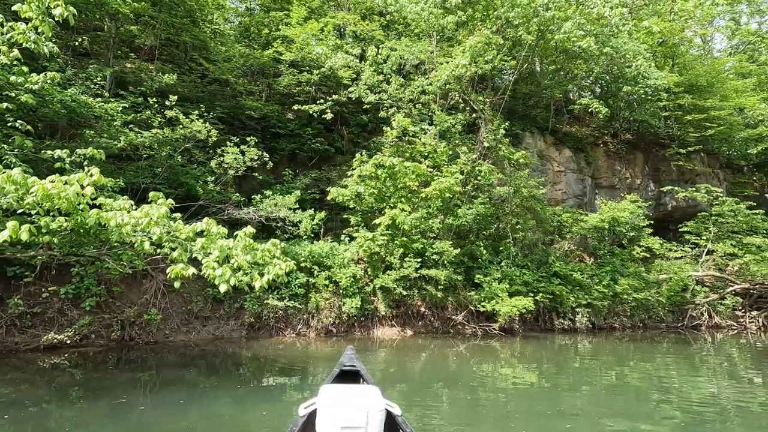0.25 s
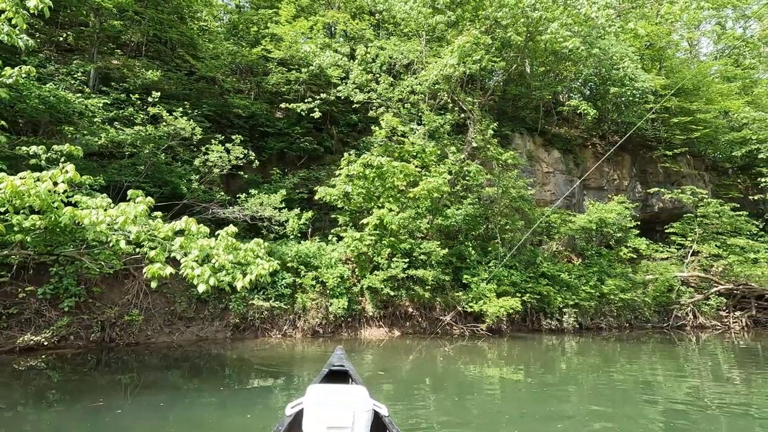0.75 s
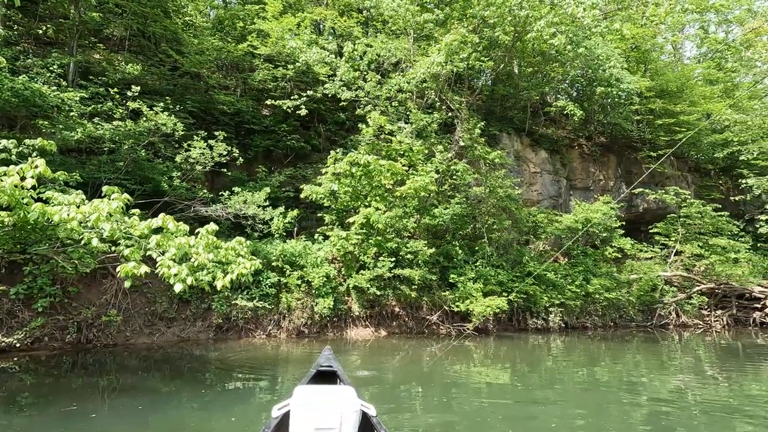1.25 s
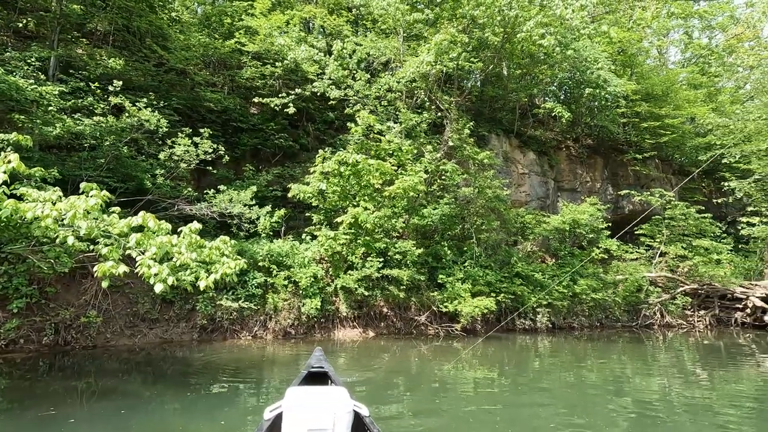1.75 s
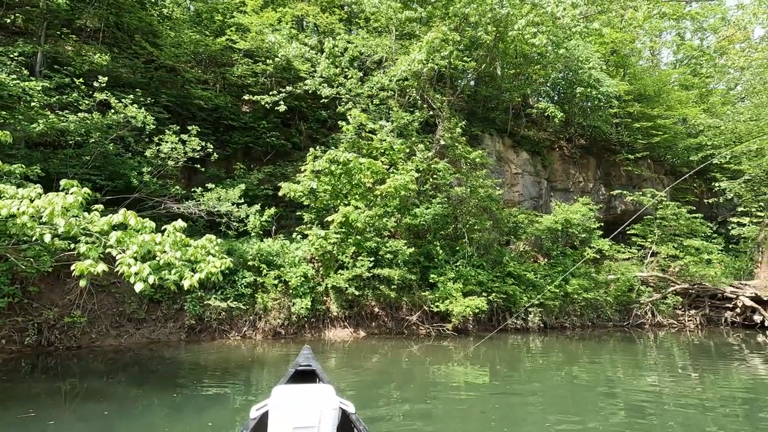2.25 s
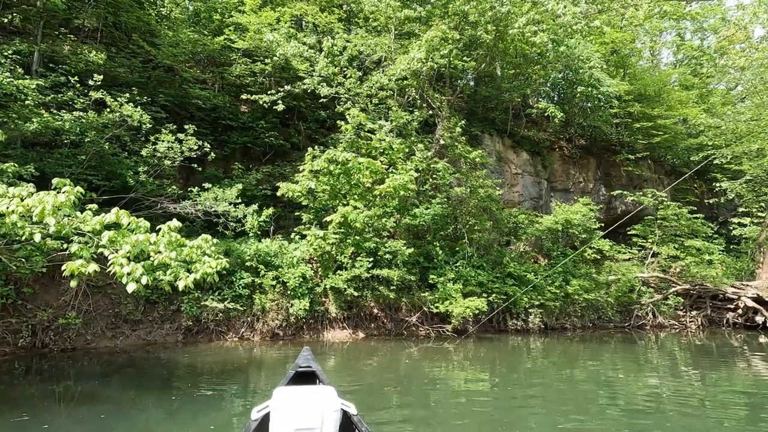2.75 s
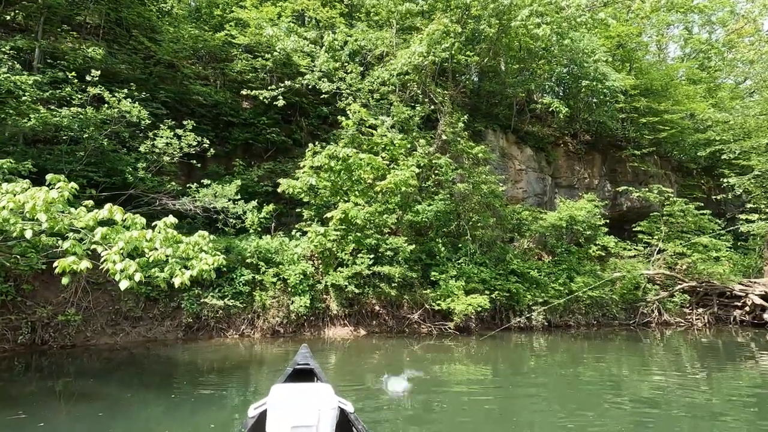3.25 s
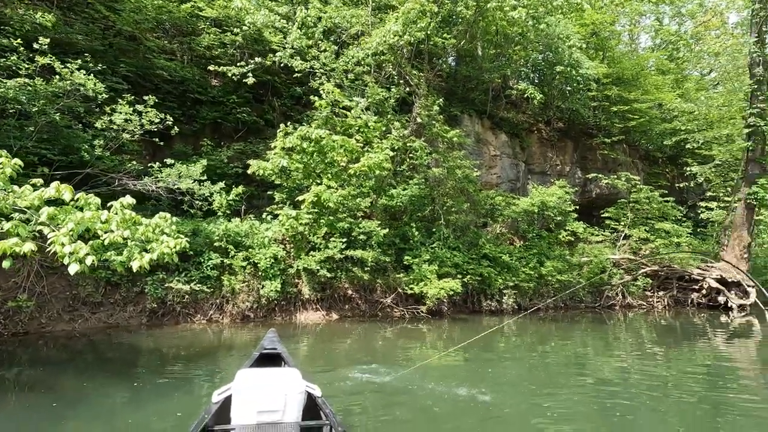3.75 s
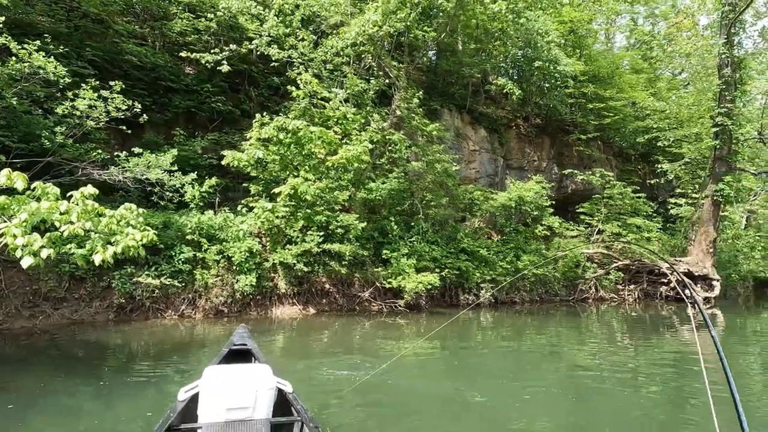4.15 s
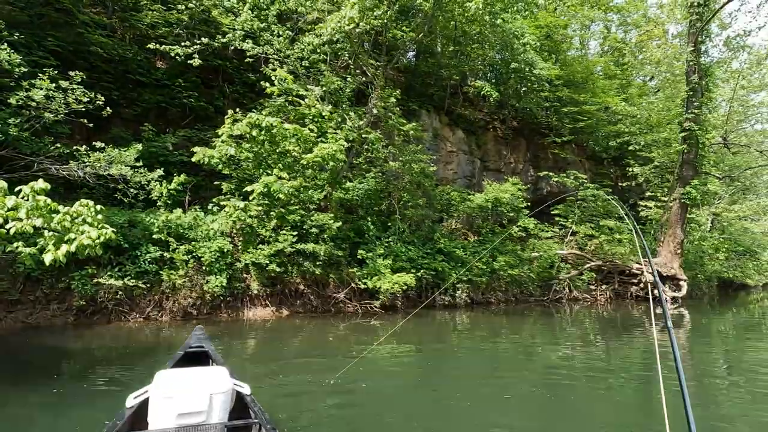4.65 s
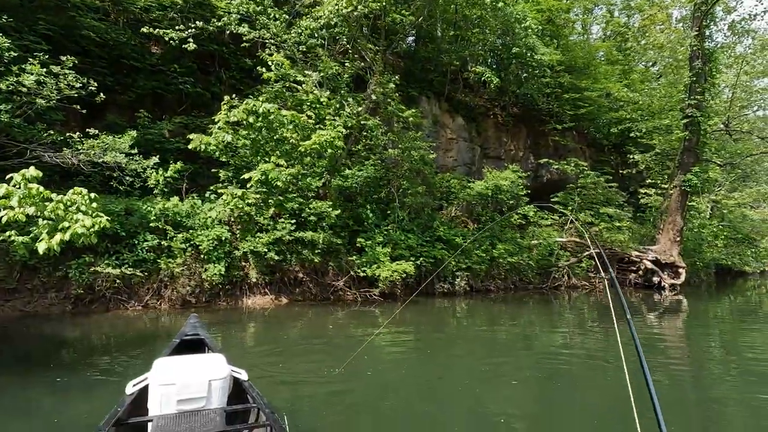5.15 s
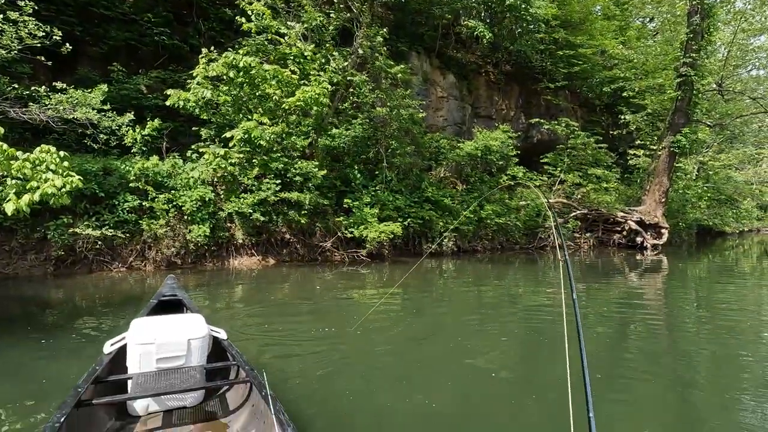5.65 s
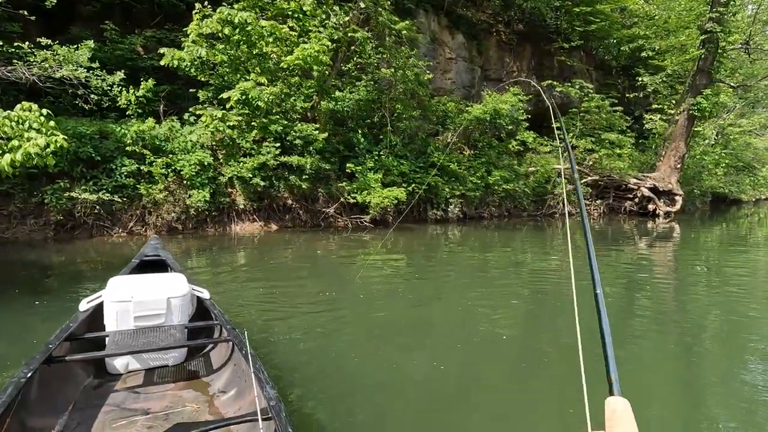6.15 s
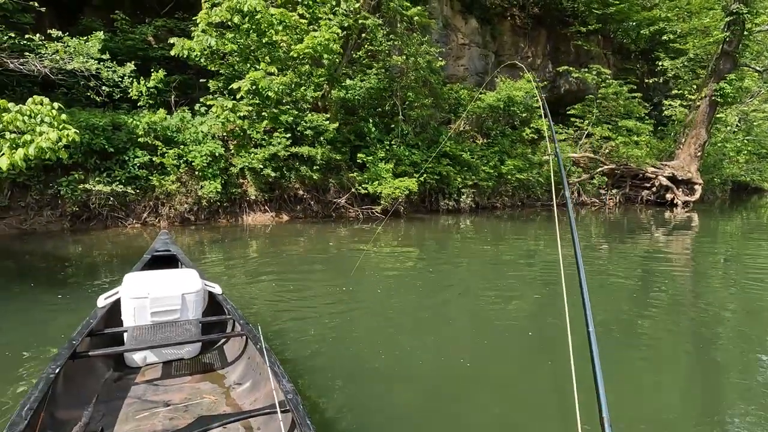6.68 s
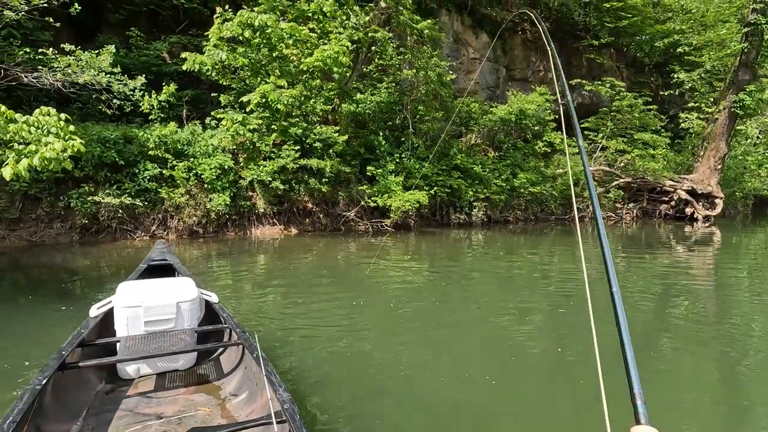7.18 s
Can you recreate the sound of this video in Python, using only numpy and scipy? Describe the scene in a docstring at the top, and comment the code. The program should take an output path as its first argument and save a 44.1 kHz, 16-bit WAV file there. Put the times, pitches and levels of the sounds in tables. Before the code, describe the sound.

A fly line hisses and snaps in repeated casts, splashes into a river, then a reel clicks in short pulls while birds chirp faintly.

```python
"""A fly line hisses through the rod guides and snaps at the end of a stroke; the fly splashes down.
Then line is pulled off a clicking reel. The caster sits in a canoe on a slow, wooded river.
Friction makes the hiss, a pawl rings the reel's spool, and trapped bubbles give the splash its pitch.
Birds whistle on the bank, water laps the hull, and light air nudges a stereo microphone.
After the splash the image narrows to the centre; near the end the sound cuts out briefly."""
import sys
import numpy as np
from scipy import signal
from scipy.fft import rfft, irfft, next_fast_len
from scipy.io import wavfile
from scipy.ndimage import uniform_filter1d

SR = 44100
rng = np.random.default_rng(int(sys.argv[2]) if len(sys.argv) > 2 else 0)


def put_to_file(sound):
    """Save the sound as 16-bit audio at rate SR, in the file named by the first command-line argument."""
    columns = np.atleast_2d(sound).T  # one column per channel
    safe = np.clip(columns, -1, 1)
    whole_steps = np.round(safe * 32767)
    wavfile.write(sys.argv[1], SR, whole_steps.astype(np.int16))


N = 327122
TIME = np.arange(N) / SR
# spectrum of a small metal contact: frequency_hz, level_db
TICK_SPECTRUM = [(1500, -15), (3000, -8.5), (5000, -6), (6600, -15.5), (8800, 0), (10800, -9.5),
                 (12000, -5), (15000, -15)]


def line_friction():
    """Sliding friction: line rubs the guides with tiny catches, louder as each stroke gains speed."""
    # start_s, fastest_s, end_s, hiss_db, rasp_db, start_drop_db, end_drop_db, pitch_ratio
    strokes = [(.44, .47, 0.54, -75.5, -81, 12, -7, 0.92), (.515, .7, .897, -52.3, -68, 8, 4, .98),
               (0.922, .94, 0.99, -70.5, -71.5, -6, 9, 1.08),
               (1.853, 2.17, 2.289, -52.5, -79.5, 21.5, 12, 1.02),
               (3.024, 3.34, 3.36, -54, -77, 19.5, 0.5, 1.023), (3.434, 3.46, 3.49, -75.5, -88, 4, 6, 1.04),
               (3.644, 3.66, 3.77, -65, -86, 14, 13, 1.03)]
    # spectra of the high hiss and the low rasp: frequency_hz, level_db
    hiss_spectrum = [(1000, -26), (2100, -18.5), (2900, -7.5), (3550, 1), (4100, 1.5), (4960, -3),
                     (5800, -12.5), (6700, -14.5), (9000, -33.5), (11100, -25), (12400, -29), (13400, -50),
                     (14500, -66)]
    rasp_spectrum = [(400, -13.5), (800, -14.5), (1100, 0), (1600, -3), (2400, 1), (3200, -4.5),
                     (4500, -29), (9000, -70)]
    # phase by which the hiss leads on the left: frequency_hz, lead_rad
    phase_lead = [(0, 0), (1000, 0.26), (2500, -1.3), (4400, -1), (6100, 0.41), (11000, 0)]
    flatness, edge_s, rasp_share = 2.56, .006, .1
    out = np.zeros((2, N))
    lead = np.exp(.5j * read(phase_lead, np.fft.rfftfreq(SR, 1 / SR)) * np.array([[1], [-1]]))
    for start, fastest, end, hiss_db, rasp_db, start_drop, end_drop, pitch in strokes:
        t = start - 2 * edge_s + TIME[:SR]
        off_peak = abs(np.interp(t, [start, fastest, end], [-1, 0, 1])) ** flatness
        arch_db = -off_peak * np.where(t < fastest, start_drop, end_drop)
        running = np.exp(-((t - np.clip(t, start, end)) / edge_s) ** 2)
        colour = [(hz * pitch if hz < 8000 else hz, db) for hz, db in hiss_spectrum]
        catches = unit(signal.oaconvolve(grains(per_s=1500, spread_db=6), click(colour))[:SR])
        hiss = unit(noise(colour, alike=.86, patchy_db=2.5, size=SR) + .35 * catches)
        hiss = irfft(rfft(hiss) * lead, SR) * amp(hiss_db + arch_db) * pan(db=-3.5)
        rasp = noise(rasp_spectrum, alike=.73, patchy_db=2, size=SR)
        rasp *= amp(rasp_db + rasp_share * arch_db) * pan(db=-.5)
        add(out, t[0], running * (amp(-1.5) * hiss + amp(2.5) * rasp))
    return out


def line_snaps():
    """Pressure pulses: a sharp crack, opposite in sign at the two microphone ports, then a puff of air."""
    # start_s, level_db, tilt_db_per_octave, puff_relative_db
    snaps = [(1.018, -44, -6.5, 2), (2.1086, -21, -3, -3), (2.7111, -31.5, -6.5, -3),
             (3.3593, -14, -6.5, -7.5)]
    # spectra of the crack and the puff at each port: frequency_hz, level_db
    crack_left = [(100, -20), (400, -4), (1100, -3.5), (2000, -11.5), (4000, -11.5), (8000, -27.5),
                  (16000, -46.5)]
    crack_right = [(60, -23), (200, -0.5), (500, -0.5), (1100, -1.5), (2000, -10), (4000, -24.5),
                   (8000, -48), (16000, -62)]
    puff_left = [(5, -15.5), (30, 2.5), (60, -3.5), (110, -8.5), (200, -13), (400, -29), (1500, -71)]
    puff_right = [(20, -29.5), (110, -10.5), (150, 3), (250, -4), (400, -12), (800, -19.5), (3000, -63)]
    out = np.zeros((2, N))
    for s, db, tilt_db, puff_db in snaps:
        add(out[0], s, -amp(db) * click(crack_left, tilt_db))
        add(out[1], s + .00014, amp(db - 2) * click(crack_right, tilt_db))
        add(out[0], s + .00059, -amp(db + puff_db) * click(puff_left))
        add(out[1], s + .00097, -amp(db + puff_db - 5) * click(puff_right))
    return out


def pawl_drops():
    """A coasting spool ticks more weakly as it slows: yields start_s, body_db, treble_db per tooth."""
    # pulls of line: start_s, tooth_count, first_rate_hz, last_rate_hz, body_db, treble_db
    pulls = [(4.842, 15, 90, 29.6, -53, -77.5), (5.1674, 12, 86, 45, -57, -84.5),
             (5.4904, 4, 57, 35, -56.5, -90), (5.8685, 3, 57, 37, -63, -86), (6.1976, 10, 69, 25, -56, -77),
             (6.6212, 16, 90.01, 33.0, -58.5, -85), (6.9634, 14, 83, 29.5, -56, -83.5),
             (7.368, 5, 85, 90, -59, -84.5)]
    coast_curve, body_db_per_octave, treble_db_per_octave = 1.6, 9, 15
    spread_db, spin_up_db, spin_up_teeth = 2, -2.5, 1.3
    for s, count, first_rate, last_rate, body_db, treble_db in pulls:
        for k, uneven in enumerate(rng.standard_normal(count)):
            coasted = min(k / max(count - 2, 1), 1) ** coast_curve
            rate = first_rate + (last_rate - first_rate) * coasted
            octaves = np.log2(rate / first_rate)
            accent_db = spread_db * uneven + spin_up_db * np.exp(-k / spin_up_teeth)
            yield (s, body_db + body_db_per_octave * octaves + accent_db,
                   treble_db + treble_db_per_octave * octaves + accent_db)
            s += 1 / rate


def reel():
    """Modal resonance: each tooth scrapes the pawl and excites the modes of the spool."""
    # frequency_hz, level_db, t60_s
    spool_modes = [(800, -16, .035), (1145, -14.5, 0.018), (1537, -18.5, .041), (2000, -7.5, 0.052),
                   (2127, -11.5, 0.027), (2596, -1, .02), (2771, -0.5, 0.044), (3800, -22.5, 0.058),
                   (5240, -35, 0.0073), (5760, -24, .014)]
    spool, out = np.zeros((2, N))
    for hz, db, t60 in spool_modes:
        add(spool, 0, amp(db) * ring(hz, t60, phase=rng.random()))
    spool, contact = spool[:SR // 16], click(TICK_SPECTRUM)[:256]
    t, bite_s = TIME[:700], .0005
    for s, body_db, treble_db in pawl_drops():
        scrape = rng.standard_normal(len(t)) * (1 - np.exp(-t / bite_s))
        # the scrape decays to a floor, as the pawl drags on the next tooth
        body = signal.fftconvolve(scrape * (amp(-60 * t / .009) + amp(-26)), spool)
        tick = signal.fftconvolve(scrape * (amp(-60 * t / .014) + amp(-13.5)), contact)
        add(out, s, at_peak(body, body_db))
        add(out, s, at_peak(tick, treble_db + 10.5))
    return bank_reverb(out, wet_db=-18)


def splash():
    """Bubble resonance: drops trap ringing air; the fly throws up spray, and stray drips follow."""
    # single drops: start_s, level_db, pitch_hz, glide_octaves_per_s, t60_s
    bubbles = [(1.0505, -43, 1050, -5, 0.011), (1.203, -59, 2208, -18, 0.022),
               (2.356, -56.5, 1075, 1.5, .16), (2.672, -62, 1930, 6, 0.037), (2.811, -61, 1755, -2, 0.088),
               (2.899, -59, 2020, 6, 0.039), (3.3025, -23.5, 1340, 2, 0.0071), (3.309, -34, 1200, -3, .022),
               (3.333, -36, 1200, -2, 0.012), (3.340, -36, 1110, 2, .012), (3.385, -50, 1057, -6, .051),
               (3.415, -49, 1010, 7, .046), (3.46, -52, 940, 3.5, .066), (3.583, -51, 1350, -3, 0.038),
               (3.764, -68, 1690, 7, 0.024), (3.778, -63, 2890, 17, 0.022), (3.804, -66, 1290, 14, 0.046)]
    # spray thrown up and falling back: peak_s, level_db, rise_s, fall_s
    bursts = [(3.302, -49.5, 0.0021, 0.024), (3.335, -42.5, 0.0053, .02), (3.46, -65.5, 0.047, 0.063),
              (3.59, -61, .07, 0.032), (3.7, -74, .1, 0.14)]
    # weighting of the spray's bubbles: pitch_hz, level_db
    bubble_weights = [(400, 1.5), (680, -9), (1150, 4), (1600, -8.5), (2300, -10), (3500, -10.5),
                      (4500, -13.5)]
    drops, spray, drips = np.zeros((3, N))
    for s, db, hz, glide, t60 in bubbles:
        add(drops, s, amp(db) * ring(hz, t60, glide, attack_s=.00052))
    start = bursts[0][0] - bursts[0][2]
    for hz in np.geomspace(420, 4500, 24):
        bubble = amp(read(bubble_weights, hz)) * hz * ring(hz, t60=16 / hz, glide=8.6)
        add(spray, start, signal.fftconvolve(grains(per_s=70, spread_db=3), bubble))
    for hz in np.geomspace(1100, 4300, 12):
        bubble = ring(hz, t60=35 / hz, glide=9.2)
        add(drips, start, signal.fftconvolve(grains(per_s=9, spread_db=4), bubble))
    spray, drips = (x / x[round(start * SR):][:SR].std() for x in (spray, drips))
    spray *= sum(amp(db - 3) * swell(s, rise_s, fall_s) for s, db, rise_s, fall_s in bursts)
    drips *= amp(-77) * swell(3.64, rise_s=.14, fall_s=.18)
    return bank_reverb(drops + spray + drips, wet_db=-15)


def fizz():
    """Incoherent summation: the finest droplets of the spray merge into a brief, high hiss."""
    # frequency_hz, level_db
    spectrum = [(2000, -14), (5000, -1), (7000, 0.5), (9000, -8.5), (11500, -6), (14000, -25.5)]
    # peak_s, level_db, rise_s, fall_s
    hump = (3.5, -79.5, 0, 0.14)
    return noise_swell(hump, spectrum)


def soft_bumps():
    """Damped oscillation: each bump of air or hull is one low, quickly dying sine."""
    # start_s, level_db, pitch_hz, t60_s
    bumps = [(1.003, -51.5, 169, 0.064), (2.098, -34.5, 140, .04), (3.35, -24.5, 136, 0.036),
             (3.59, -50.5, 486, 0.034), (5.961, -46.5, 145, 0.077), (6.275, -71, 139.5, 0.063),
             (7.054, -51.5, 141.7, 0.11)]
    out = np.zeros(N)
    for s, db, hz, t60 in bumps:
        add(out, s, amp(db) * ring(hz, t60, attack_s=.002))
    return out


def metal_jingles():
    """Contact excitation: a small loose metal part chatters and rings in three high modes."""
    # time_s, level_db, low_mode_db
    jingles = [(0.445, -77, -89), (0.934, -64, -64.5), (0.9446, -64.5, -75), (1.7168, -80, -87),
               (2.8385, -69.5, -83), (4.954, -70.5, -88.5), (5.275, -74, -87.5), (5.287, -65.5, -88.5),
               (6.248, -62, -90), (6.2636, -66, -81), (6.276, -50.5, -77), (6.7077, -65, -88),
               (6.722, -64, -87.5), (7.0279, -68, -86), (7.0437, -62, -81)]
    # frequency_hz, level_db, t60_s
    metal_modes = [(7240, 0, 0.14), (11610, 1, 0.07), (12800, -15, 0.088)]
    out = np.zeros(N)
    for s, db, low_db in jingles:
        chatter = rng.standard_normal(400) * signal.windows.hann(400)
        for (hz, mode_db, t60), blow_db in zip(metal_modes, (low_db + 3, db - 6.5, db - 4)):
            mode = signal.fftconvolve(chatter, ring(hz, t60))
            add(out, s - .003, at_peak(mode, blow_db + mode_db))
        contact = signal.fftconvolve(chatter, click(TICK_SPECTRUM)[:256]) / 3
        add(out, s - .003, amp(db - 11.5) * contact)
    return out * pan(db=5)


def rod_taps():
    """Damped impacts: line and fingers tap the rod, and the reel's pawl gives a lone first tick as some pulls
    start; each is a noise burst with one broad spectral peak."""
    # start_s, level_db, centre_hz
    taps = [(0.101, -69.5, 6200), (.445, -66, 5030), (.932, -59, 5200), (.942, -52.5, 4400),
            (.959, -73, 4200), (0.973, -49, 4260), (2.67, -60.5, 4660), (4.029, -75, 4400),
            (5.284, -65, 4150), (5.476, -64, 905), (5.512, -55.5, 1490), (5.959, -63.5, 680),
            (6.151, -69, 4270), (6.246, -56, 4320), (6.273, -62, 1830), (6.51, -58.5, 5160),
            (6.526, -59.5, 1960), (6.605, -64, 2020), (6.9455, -65, 2400), (7.349, -68.5, 2710)]
    out, t = np.zeros(N), TIME[:1000]
    attack_s, t60 = .0004, .021
    for s, db, hz in taps:
        scrape = rng.standard_normal(len(t)) * (1 - np.exp(-t / attack_s)) * amp(-60 * t / t60)
        colour = [(hz / 6, -18), (hz / 1.8, -7), (hz, 0), (hz * 1.34, -13), (hz * 4, -37), (hz * 12, -62)]
        add(out, s, at_peak(signal.fftconvolve(scrape, click(colour)), db))
    return bank_reverb(out, wet_db=-18.5)


def birds():
    """Frequency modulation: pure gliding whistles, echoed and softened by the trees."""
    # contour of each note: offset_s, pitch_hz, level_db
    contours = {"arch": [(0, 2507, -15), (.022, 3800, -7), (.032, 3650, -4), (.05, 2852, -1.5),
                (.066, 2707, 1.5), (.083, 2674, 0.5)], "step": [(0, 4565, -9.5), (.016, 4120, -2),
                (.033, 4250, -2.5), (.046, 4000, -4), (.06, 3500, 1.5), (.1, 3433, -10), (.14, 3440, -15)],
                "fall": [(0, 1840, -10), (.018, 2185, 4.5), (.033, 1900, -3), (.05, 1650, -4.5),
                (.08, 1600, -9.5)], "dip": [(0, 4500, -2), (.015, 3400, -1.5), (.035, 2700, 0),
                (.065, 2400, -6), (.082, 2750, -1), (.098, 2780, -3)], "peep": [(0, 2593, 1),
                (.014, 2692, -1.5), (.03, 2770, -2)], "rise": [(0, 890, 4), (.012, 1316, 0), (.03, 2430, 2),
                (.045, 2690, 1)], "chip": [(0, 4240, -3.5), (.008, 3835, -7.5), (.018, 3200, 2.5)],
                "slur": [(0, 2765, -13), (.02, 2540, 0), (.04, 2330, -1), (.06, 2270, -3.5)],
                "thin": [(0, 3180, 3), (.03, 3087, -1), (.12, 3070, 1.5)]}
    # notes of each phrase: offset_s, note_name, accent_db
    phrases = {"seesaw": [(0, "arch", -0.5), (.096, "step", .5)], "warble": [(0, "chip", -5),
               (.026, "peep", -1), (.068, "thin", -11.5), (.088, "slur", -4.5), (.189, "peep", 2.5),
               (.247, "fall", -6.5)], "arch": [(0.0011, "arch", 0)], "rise": [(0, "rise", 0)],
               "dip": [(0, "dip", -1.5)]}
    # phrases as sung: start_s, phrase_name, level_db
    songs = [(.285, "dip", -70.5), (.9, "seesaw", -71), (1.23, "seesaw", -64), (1.534, "seesaw", -60),
             (1.835, "seesaw", -55.5), (2.427, "seesaw", -62), (2.923, "arch", -72),
             (3.82, "warble", -69.5), (3.986, "rise", -64.5), (4.238, "warble", -64),
             (4.648, "warble", -64.5), (5.059, "warble", -61.5)]
    # single reflections from trees and a rock face: delay_s, level_db
    echoes = [(.021, -16), (.058, -16.5), (.094, -19.5)]
    direct = np.zeros(N)
    for s, phrase, db in songs:
        for offset_s, note, accent_db in phrases[phrase]:
            at, hz, note_db = np.transpose(contours[note])
            t = np.arange(0, at[-1], 1 / SR)
            waver = 1 + .01 * unit(uniform_filter1d(rng.standard_normal(len(t)), size=400))
            pitch = uniform_filter1d(np.interp(t, at, hz), size=350) * waver
            envelope = amp(db + accent_db + np.interp(t, at, note_db)) * signal.windows.tukey(len(t), .2)
            add(direct, s + offset_s, envelope * np.sin(2 * np.pi * np.cumsum(pitch) / SR))
    out = direct.copy()
    for delay_s, db in echoes:
        add(out, delay_s, amp(db) * direct)
    return amp(-7) * bank_reverb(out, wet_db=-1.8)


def far_birds():
    """Scattering: chatter deep in the trees arrives blurred into a band of noise."""
    # frequency_hz, level_db
    spectrum = [(700, -30), (1100, -4), (1600, -5), (2150, 3), (2600, -2), (3100, -12), (3800, -34)]
    # peak_s, level_db, rise_s (its sign has no effect), fall_s
    hump = (.04, -77.5, -2, 0.18)
    return noise_swell(hump, spectrum)


def wind():
    """Turbulence: light air and short gusts make low pressure fluctuations at the microphone ports."""
    # frequency_hz, level_db
    spectrum = [(10, 6), (28, 5.5), (48, -7), (70, -19), (110, -24), (200, -40.5), (400, -69), (1500, -100)]
    # time_s, level_db
    levels = [(0, -57.5), (1.4, -59), (3.2, -58.5), (3.8, -66), (5.5, -62.5), (7.42, -65)]
    # peak_s, level_db, width_s, left_minus_right_db
    gusts = [(.2, -62, 0.5, -9), (0.66, -50, 0.086, 1), (0.85, -43, 0.058, 1.5), (1.06, -54, 0.081, 17),
             (1.558, -62.5, 1, -4.5), (2.2, -53, 0.086, 1), (2.318, -38, 0.064, 0.5),
             (2.7, -65.5, 0.29, -0.5), (3.072, -52.5, 0.12, 1), (5.88, -52, 0.076, 2),
             (6.058, -47.5, 0.072, -0.5)]
    gust_spectrum = [(12, 12.5), (35, 5), (100, -11), (180, -26.5), (400, -52), (900, -84)]
    gusting = sum(amp(db) * pan(side_db) * swell(s, width, width) for s, db, width, side_db in gusts)
    breeze = gain_curve(levels) * noise(spectrum, alike=.9, patchy_db=1)
    return breeze + gusting * noise(gust_spectrum, alike=.22, patchy_db=1.5)


def far_rumble():
    """Coherence at long wavelengths: a distant low noise, nearly alike in both channels."""
    # frequency_hz, level_db
    spectrum = [(60, -24), (110, -12), (150, 1.5), (200, -2), (260, -9.5), (400, -22.5), (700, -38),
                (1500, -56), (4000, -89)]
    # time_s, level_db
    levels = [(0, -69.5), (1.6, -72), (2.6, -71.5), (2.9, -67), (3.7, -65.5), (4.6, -72.5), (5.7, -69),
              (6.4, -76), (7.42, -72.5)]
    return gain_curve(levels) * noise(spectrum, alike=.92, patchy_db=2.5)


def river():
    """Incoherent sources add in power: laps wash and gurgle along the hull over the steady river."""
    # peak_s, rise_s, fall_s, wash_db, gurgle_db
    laps = [(.03, 0.083, 0.14, -77.5, -92), (.72, 0.24, 0.41, -72.5, -75.5), (1.27, 0.068, 0.36, -72, -80),
            (1.88, 0.23, 0.12, -71.5, -87), (2.35, 0.088, 0.2, -73.5, -84), (2.68, 0.12, 0.17, -73, -80.5),
            (3.55, 0.34, 0.16, -70, -74), (4.22, .08, .09, -80, -73), (4.98, 0.17, 0.16, -77.5, -85),
            (5.68, 0.16, 0.14, -82.5, -77), (5.901, 0.1, 0.1, -77.5, -76), (6.35, 0.17, 0.24, -81, -88.5),
            (7.04, 0.087, 0.067, -85, -76.5)]
    # spectra of the wash and the low gurgle: frequency_hz, level_db
    wash_spectrum = [(180, -20.5), (320, -5.5), (480, -6), (700, -10.5), (1100, -0.5), (1800, -8.5),
                     (2650, -13.5), (3100, -13.5), (3900, -20), (5000, -25), (7000, -47.5), (14000, -74)]
    gurgle_spectrum = [(200, -22), (400, -6), (720, -0.5), (1000, -7), (1800, -22), (5000, -45)]
    steady_db = -87.5
    power = sum((amp([[wash_db], [gurgle_db]]) * swell(s, rise_s, fall_s)) ** 2
                for s, rise_s, fall_s, wash_db, gurgle_db in laps)
    wash_gain, gurgle_gain = np.sqrt(power)
    wash = np.hypot(amp(steady_db), wash_gain) * noise(wash_spectrum, alike=.67, patchy_db=3)
    return wash + gurgle_gain * noise(gurgle_spectrum, alike=.7, patchy_db=4)


def leaves():
    """A diffuse field: the high rustle of leaves is only weakly correlated between the channels."""
    # frequency_hz, level_db
    spectrum = [(1500, -16), (3000, 10.5), (4500, 3), (6000, 0.5), (7500, -7.5), (9000, -16), (12000, -11),
                (15000, -25)]
    # time_s, level_db
    levels = [(0, -88), (.3, -83.5), (1.1, -89), (1.4, -82), (2.5, -84), (3.7, -82), (4.1, -95),
              (7.42, -100)]
    return gain_curve(levels) * noise(spectrum, alike=.22, patchy_db=3.5)


def microphone_hiss():
    """Self-noise: the microphone's own faint, broadband floor."""
    # frequency_hz, level_db
    spectrum = [(1000, -6), (3000, 3.5), (5000, 1.5), (7000, -4.5), (10000, 0), (12500, -2.5), (15000, -9)]
    return amp(-100) * noise(spectrum, alike=.43, patchy_db=1.5)


def bank_reverb(x, wet_db):
    """Reverberation: the wooded bank adds a decaying stereo tail of scattered reflections."""
    # frequency_hz, t60_s
    decay_times = [(200, .35), (1500, 0.71), (3400, 1), (8000, 0.93)]
    taps = rng.standard_normal((3, SR)) * (rng.random((3, SR)) < .05) * (TIME[:SR] > .012)
    hz, t, z = signal.stft(taps[2] + .52 * taps[:2], SR, nperseg=256)
    tail = signal.istft(z * amp(-60 * t / read(decay_times, hz)[:, None]), SR, nperseg=256)[1]
    tail /= np.linalg.norm(tail[0])
    return x + amp(wet_db) * signal.fftconvolve(np.atleast_2d(x), tail, axes=1)[:, :N]


def noise(spectrum, alike, patchy_db, size=N):
    """Coloured stereo noise with channel correlation `alike` and random patches in time and pitch."""
    common, side = rng.standard_normal((2, size))
    turn = np.arccos(np.clip(alike, -1, 1)) / 2
    z = signal.stft(np.cos(turn) * common + np.sin(turn) * np.array([side, -side]), nperseg=512)[2]
    patches = uniform_filter1d(rng.standard_normal(z.shape[1:]), size=7, axis=0)
    patches = unit(uniform_filter1d(patches, size=6, axis=1))
    x = signal.istft(z * amp(patchy_db * patches), nperseg=512)[1][:, :size]
    padded = next_fast_len(size)
    colour = amp(read(spectrum, np.fft.rfftfreq(padded, 1 / SR)))
    return unit(irfft(rfft(x, padded) * colour, padded)[:, :size])


def noise_swell(hump, spectrum):
    """Coloured noise under one smooth envelope."""
    s, db, rise_s, fall_s = hump
    return amp(db) * swell(s, rise_s, fall_s) * noise(spectrum, alike=.59, patchy_db=3.5)


def click(spectrum, tilt_db=0):
    """A minimum-phase pulse of peak 1; tilt_db is an added slope per octave in the treble."""
    hz = np.fft.rfftfreq(4096, 1 / SR)
    log_gain = np.log(amp(read(spectrum, hz) + tilt_db * np.log2(hz / 1000 + 1)))
    log_response = np.conj(signal.hilbert(np.r_[log_gain, log_gain[-2:0:-1]]))
    return at_peak(np.fft.ifft(np.exp(log_response)).real, db=0)


def ring(hz, t60, glide=0, phase=0, attack_s=.00005):
    """A damped sine; glide is in octaves a second, phase in cycles."""
    t = TIME[:int(min(t60, .4) * SR) + 64]
    cycles = np.cumsum(hz * 2 ** (glide * t)) / SR + phase
    return amp(-60 * t / t60) * (1 - np.exp(-t / attack_s)) * np.sin(2 * np.pi * cycles)


def grains(per_s, spread_db):
    """One second of Poisson impulses of uneven size and sign."""
    height = amp(spread_db * np.minimum(rng.exponential(1, SR), 4)) * rng.choice([-1, 1], SR)
    return height * (rng.random(SR) < per_s / SR)


def swell(peak_s, rise_s, fall_s):
    """A two-sided Gaussian hump of height 1."""
    return np.exp(-((TIME - peak_s) / np.where(TIME < peak_s, rise_s, fall_s)) ** 2)


def gain_curve(points):
    """Gain over time through points of time_s, level_db."""
    return amp(np.interp(TIME, *np.transpose(points)))


def read(points, hz):
    """Interpolates on a log-frequency axis."""
    f, value = np.transpose(points)
    return np.interp(np.log(hz + 1), np.log(f + 1), value)


def amp(db):
    """Decibels to gain."""
    return 10 ** (np.asarray(db) / 20)


def unit(x):
    """Scales to rms 1."""
    return x / np.sqrt(np.mean(x ** 2) + 1e-20)


def at_peak(x, db):
    """Scales to a peak level."""
    return amp(db) * x / abs(x).max()


def pan(db):
    """Stereo gains for a left-minus-right level difference."""
    return amp([[db / 2], [-db / 2]])


def add(mix, s, sound):
    """Superposes a sound on the mix at s seconds."""
    part = mix[..., max(round(s * SR), 0):][..., :sound.shape[-1]]
    part += sound[..., :part.shape[-1]]


def scene():
    """Superposition: tackle, water and riverside add over the microphone's noise floor."""
    floor = microphone_hiss()
    casting = line_friction() + line_snaps() + soft_bumps() + reel() + metal_jingles() + rod_taps()
    water = splash() + fizz()
    riverside = birds() + far_birds() + wind() + far_rumble() + river() + leaves()
    return casting + water + riverside + floor


def record(dry):
    """Mid-side narrowing after the splash, a brief cut-out near the end, then a low-pass band limit."""
    # stereo width: time_s, side_db
    width = [(3.55, -1), (3.8, -5), (4.1, -27.5), (7.42, -21.5)]
    # overall gain with its brief dip: time_s, gain_db
    dropout = [(7.2, 2.5), (7.204, -59.5), (7.262, -50), (7.275, -10), (7.33, 5)]
    cutoff_hz = 15800
    mid = dry.mean(0)
    narrowed = mid + (dry - mid) * gain_curve(width)
    lowpass = signal.firwin(511, cutoff_hz, window=("kaiser", 9), fs=SR)
    return signal.oaconvolve(narrowed * gain_curve(dropout), lowpass[None], "same")


dry = scene()
out = record(dry)
put_to_file(out)
```